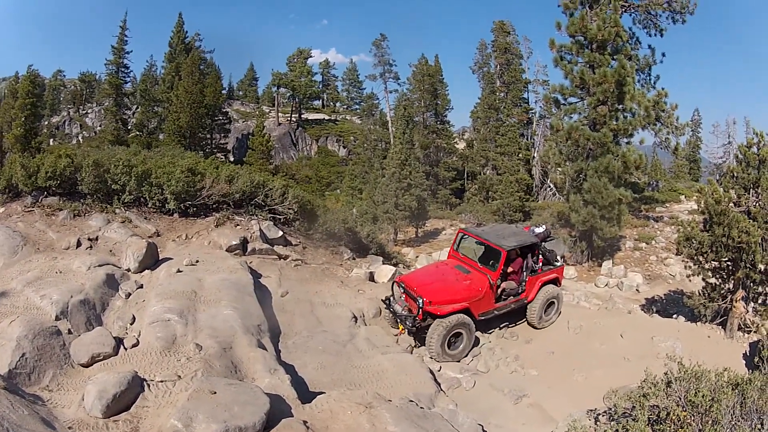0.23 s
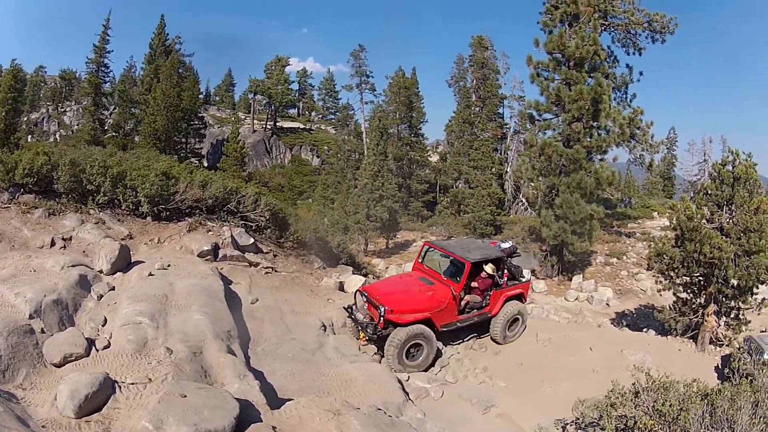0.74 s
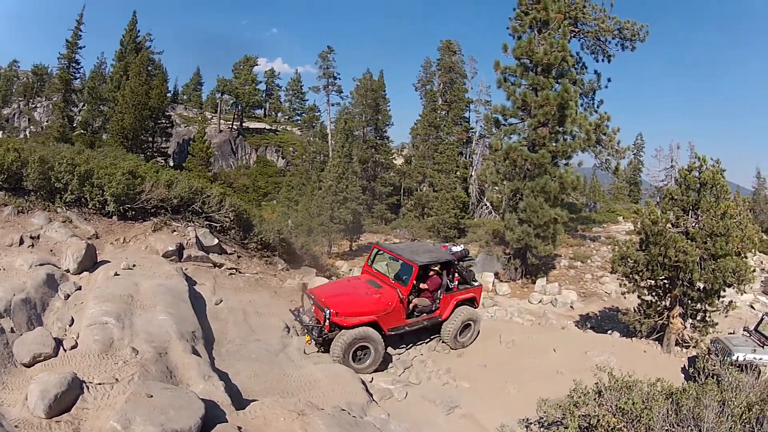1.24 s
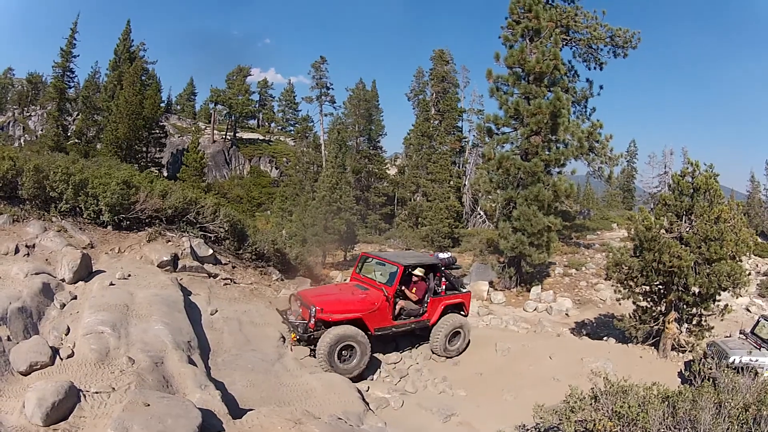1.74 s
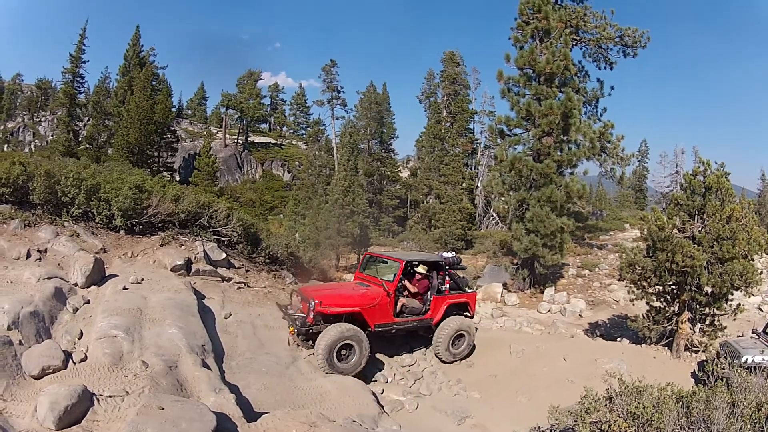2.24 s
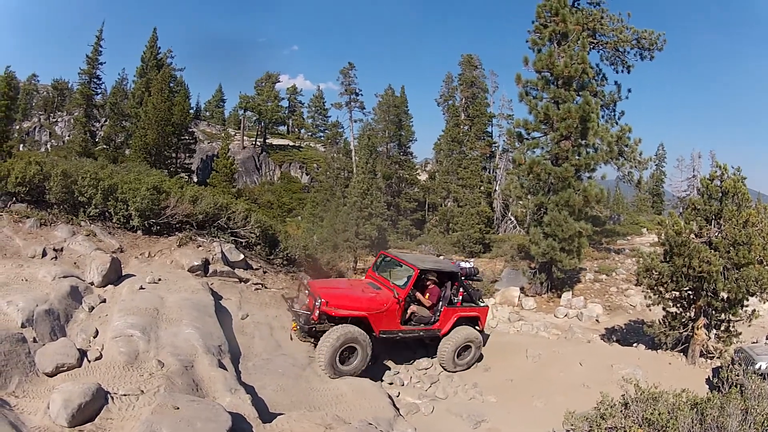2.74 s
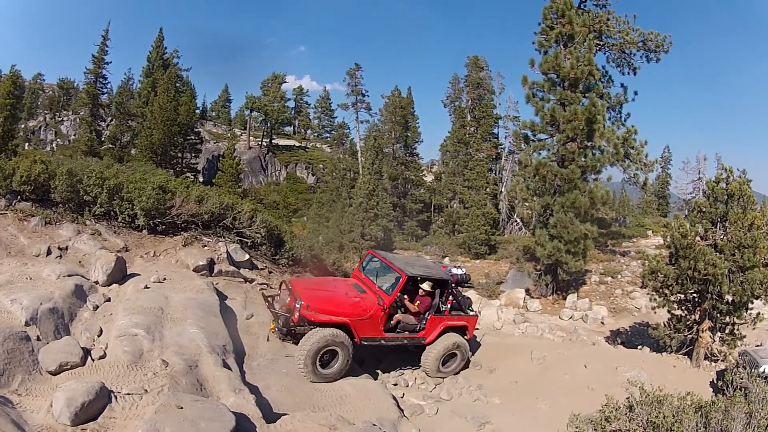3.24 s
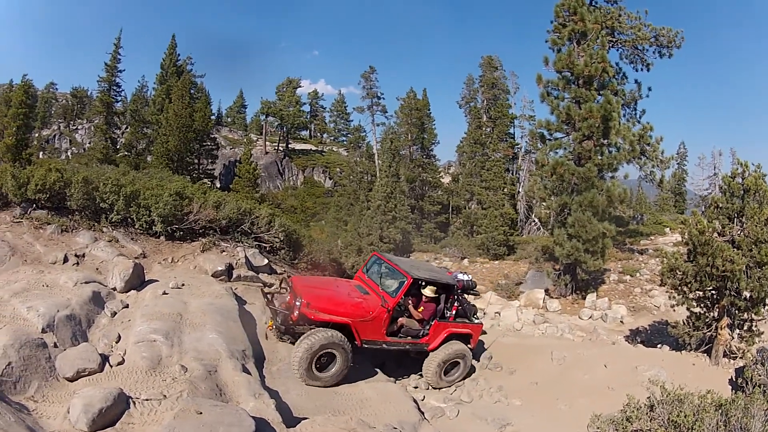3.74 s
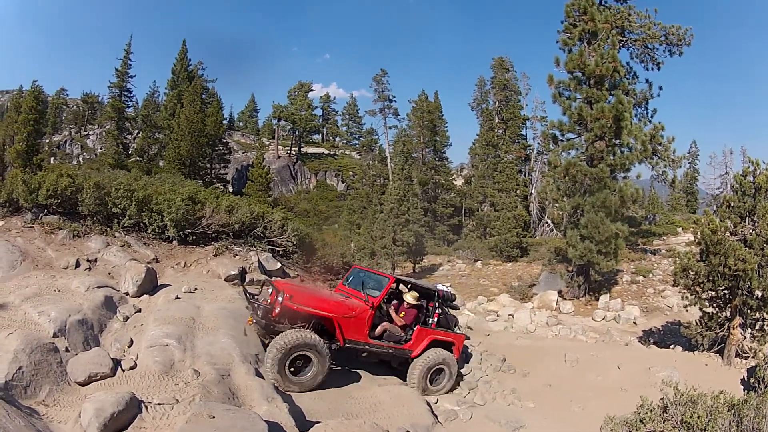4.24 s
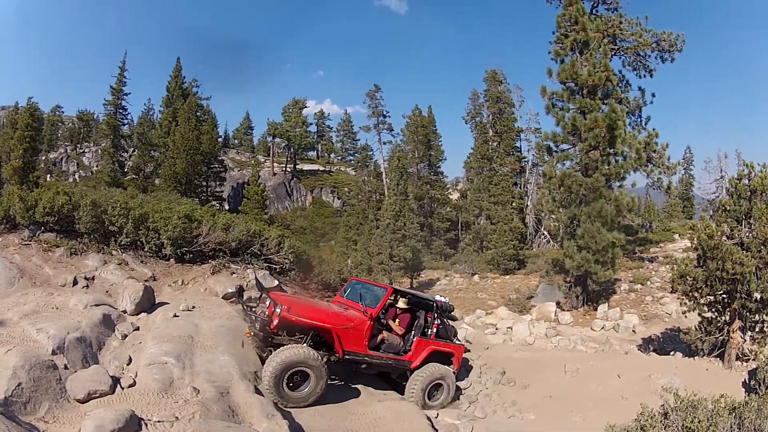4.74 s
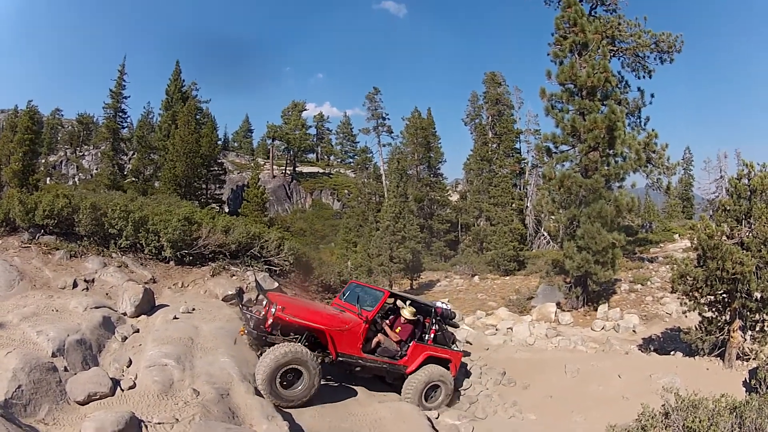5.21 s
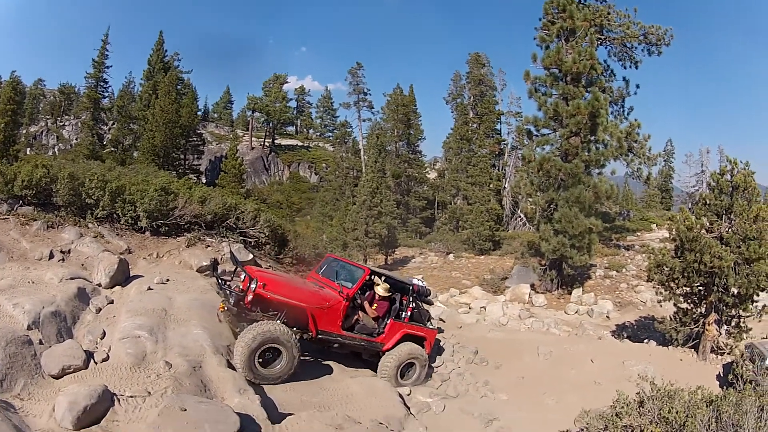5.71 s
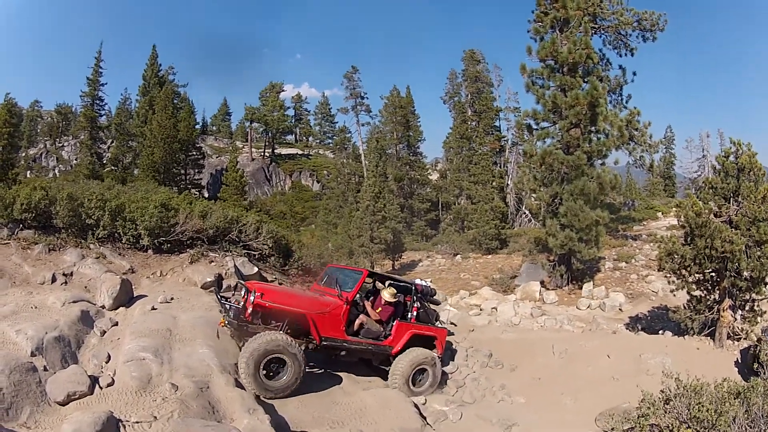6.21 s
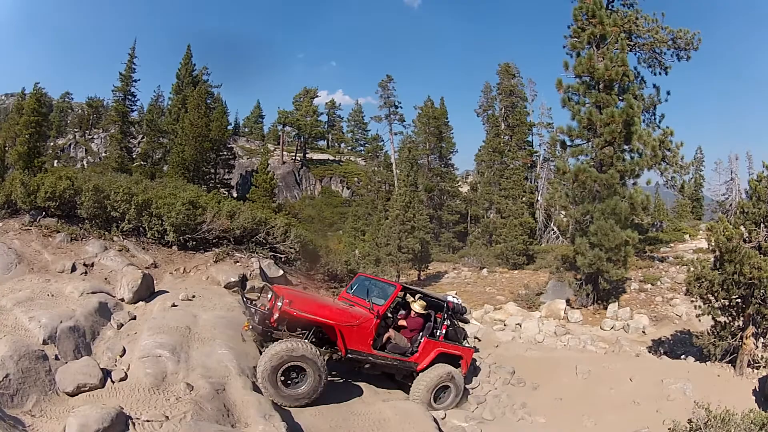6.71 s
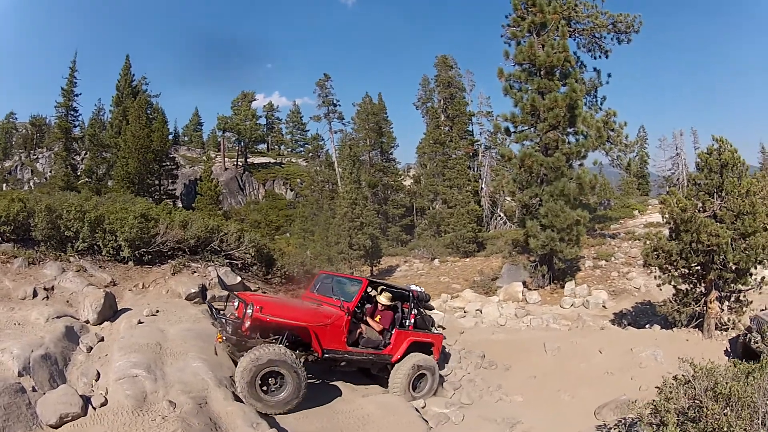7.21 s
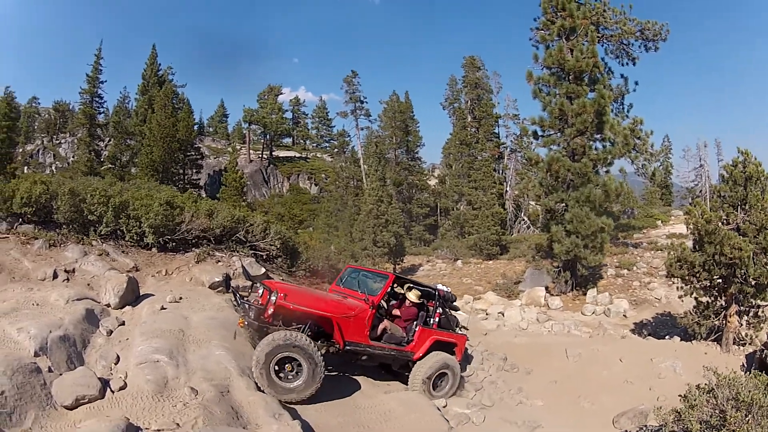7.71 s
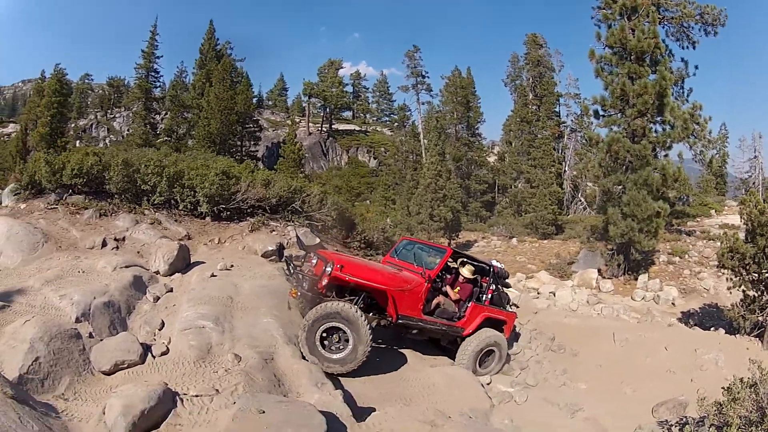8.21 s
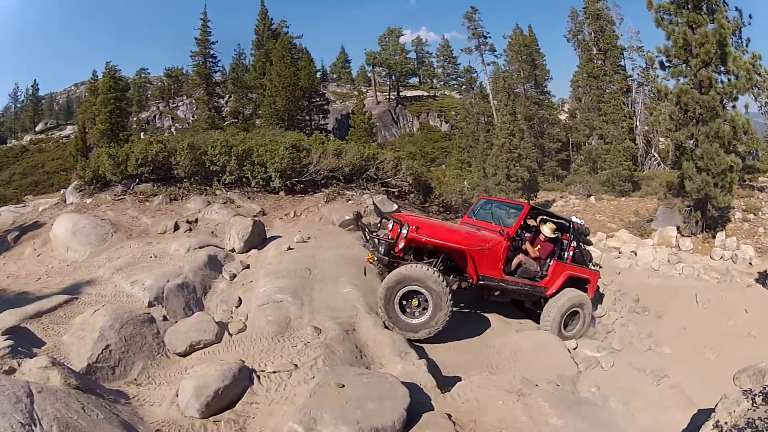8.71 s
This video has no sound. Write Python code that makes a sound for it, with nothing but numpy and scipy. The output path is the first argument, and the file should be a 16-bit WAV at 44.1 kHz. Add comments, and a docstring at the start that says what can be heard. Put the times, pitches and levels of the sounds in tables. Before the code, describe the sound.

Outdoors in open forest, an off-road car some way off crawls up rock, its uneven low exhaust throb rising and falling with the throttle. Tyres give brief gritty scrapes and rubbery groans, then a low judder. A light breeze runs beneath. Small taps touch the camera now and then, and near the end a hand shifts its grip with rubs, thumps and loud knocks.

```python
"""On a rock slab in a forest, some way off, an eight-cylinder off-road car crawls upward, its exhaust throbbing.
The exhaust is a train of unequal pulses ringing in a pipe; noise bands give its gas and the whirring engine bay.
Tyres scrape, groan and judder by friction on gritty stone and springs squeak; filtered noise is a light wind.
A hand taps the camera now and then, ringing the modes of its case, and near the end shifts its grip
with rubs and hard knocks."""
import sys
import numpy as np
from scipy import signal
from scipy.fft import rfft, irfft
from scipy.io import wavfile
from scipy.ndimage import uniform_filter1d

SR = 44100
rng = np.random.default_rng(int(sys.argv[2]) if len(sys.argv) > 2 else 0)


def wav_out(sig):
    """Save sig, one row per channel (or a flat mono array), as 16-bit PCM at SR to the path in sys.argv[1]."""
    wavfile.write(sys.argv[1], SR, np.round(np.clip(np.atleast_2d(sig).T, -1, 1) * 32767).astype(np.int16))


N = 394681
TIME = np.arange(N) / SR  # seconds

# Crank speed. Each row: time in seconds, speed in revolutions per minute.
CRANK_SPEED = [(0.0, 791), (0.43, 853), (1.19, 1078), (1.53, 1085), (1.9, 1314), (2.28, 1123), (3.61, 1144),
               (4.1, 1423), (4.46, 1751), (4.63, 1687), (4.94, 1789), (5.24, 1136), (5.45, 998),
               (5.62, 1110), (6.05, 1275), (6.6, 1330), (7.12, 1088), (7.41, 1416), (8.03, 1575),
               (8.69, 1540), (8.95, 1592)]
# Cylinders in firing order. Each row: relative pulse strength, travel time through the manifold in ms.
CYLINDERS = [(0.83, 4.52), (1.09, 6.41), (0.3, 5.14), (1.03, 4.38), (0.91, 0.0), (0.57, 4.41), (1.48, 5.12),
             (0.79, 0.02)]
CRANK_START = .095  # fraction of the two-turn cycle already passed at the start


def firings():
    """Four-stroke cycle: each cylinder fires once in two crank turns, less evenly at low speed."""
    rpm = follow(CRANK_SPEED)
    count = len(CYLINDERS)
    cycles = np.cumsum(rpm / (2 * 60)) / SR + CRANK_START
    fired = np.floor(count * cycles).astype(int)
    at = np.flatnonzero(np.diff(fired)) + 1
    strength, travel_ms = np.transpose(CYLINDERS)[:, fired[at] % count]
    spread = .04 + .08 * (rpm.min() / rpm[at]) ** 2
    arrival = at + np.round(travel_ms * SR / 1000).astype(int)
    pulses = np.zeros(N)
    pulses[np.minimum(arrival, N - 1)] = strength * (1 + spread * rng.standard_normal(len(at)))
    return pulses


# Load on the engine. Each row: time in seconds, effort in dB, of which each engine sound takes a share.
EFFORT = [(0, -0.5), (.45, -8.5), (1.0, 1.5), (1.35, -4), (1.85, 0), (2.35, -6), (2.95, -4.5), (3.36, -11),
          (3.95, -0.5), (4.6, 3), (5.35, -2), (6.4, 2), (6.95, -4.5), (7.5, 1.5), (7.9, -3)]
CRUISE_RPM = 1200


def loudness(law):
    """Source-strength law: the gain grows with speed, nearness and effort."""
    db, doubling_db, nearing_db_per_s, share = law
    speed_db = doubling_db * np.log2(follow(CRANK_SPEED) / CRUISE_RPM)
    return amp(db + speed_db + nearing_db_per_s * TIME + share * follow(EFFORT))


# Resonance of exhaust pipe and silencer. Each row: frequency in Hz before the heat shift, relative gain in dB.
PIPE = [(20, -42), (55, -23), (80, -22), (110, -22), (125, -27), (140, -12), (155, -7), (170, -1), (185, 3),
        (200, -10.5), (215, -25), (240, -35), (380, -32), (480, -42), (1500, -65)]
# Exhaust loudness: level in dB at cruising speed and time zero, dB per doubling of speed,
# dB per second as the car nears and turns side-on, share of the effort.
DRONE_LAW = (-51, 15.5, 1.1539, 1.08)
# Pitch rise of the hotter pipe, as fractions; at cruising speed the listed pitch holds at WARM_AT_S seconds.
HEAT_PER_DOUBLING, HEAT_PER_S, WARM_AT_S = .117, .009, 6
THROB = 0.19  # exponent on short-term power: the boom grows more than in proportion


def exhaust(pulses):
    """Pipe resonance: pulses ring at a pitch that rises with heat; unequal cylinders throb once a cycle."""
    speed_heat = HEAT_PER_DOUBLING * np.log2(follow(CRANK_SPEED) / CRUISE_RPM)
    pitch = 1 + speed_heat + HEAT_PER_S * (TIME - WARM_AT_S)
    # filter on a warped clock, then return to real time, so that the resonances move
    clock = np.cumsum(pitch)
    ticks = np.arange(clock[-1])
    ringing = colour(np.interp(ticks, clock, pulses), PIPE)
    note = np.interp(clock, ticks, ringing)
    note = note * smooth(note ** 2, size=450) ** THROB
    levelled = note / np.sqrt(smooth(note ** 2, size=7000))
    return loudness(DRONE_LAW) * levelled


def puff_strength(pulses):
    """Exponential decay: each firing lets out a puff fading over 9 ms, the strong cylinders most."""
    return unit(signal.lfilter([1], [1, -np.exp(-1 / (.009 * SR))], pulses ** 2))


# Colour of the escaping gas. Each row: frequency in Hz, relative density in dB per Hz.
GAS = [(150, -32), (260, 2), (365, -1), (454, -3), (722, -16), (808, -6), (977, -15.5), (1290, -26),
       (1400, -12.5), (1820, -35), (3080, -120)]
# Gas loudness: level in dB at cruising speed and time zero, dB per doubling of speed,
# dB per second of nearing, share of the effort.
GAS_LAW = (-69, 9.5, 1.303, 0.32)


def gas_rush(puffs, steady=1.0, flutter_db=1.5):
    """Turbulent jet noise: a steady stream plus the puffs, fluttering at random."""
    flow = rng.standard_normal(N) * (steady + puffs)
    gas = colour(flow * amp(flutter_db * wander(11.3)), GAS)
    return loudness(GAS_LAW) * unit(gas)


# Colour of the engine bay. Each row: frequency in Hz, relative density in dB per Hz.
BAY = [(900, -21), (1300, -23.5), (1640, -13), (1900, -14.5), (2100, -2), (2330, -13), (2500, -9.5),
       (2800, -15.5), (3240, -18), (3800, -20.5), (4700, -27), (5800, -20.5)]
# Bay loudness: level in dB at cruising speed and time zero, dB per doubling of speed,
# dB per second of nearing, share of the effort.
BAY_LAW = (-59, 6.5, 0.6252, 0.18)


def engine_bay(puffs, steady=5, drift_db=1.3):
    """Forced panel vibration: steady whirr plus a shake at each firing, ringing near 2 kHz."""
    bay = colour(rng.standard_normal(N) * (steady + puffs), BAY)
    bay = ground_echo(bay) * amp(drift_db * wander(2.1))
    return loudness(BAY_LAW) * unit(bay)


def ground_echo(x):
    """Comb filtering: the rock returns the sound after a delay that drifts as the car rocks."""
    delay_s = .0024 + .00012 * wander(1)
    return x + .35 * np.interp(TIME - delay_s, TIME, x)


# Tyres scraping on rock. Each row: start in seconds, length in seconds, level in dB.
SCRAPES = [(2.28, 0.44, -58.5), (4.357, 0.074, -44), (4.825, 0.065, -47.5), (4.87, 0.28, -50),
           (5.423, 0.032, -47.5), (5.9, 0.063, -51), (7.308, .04, -42), (7.364, 0.046, -52)]
# Colour of gritty stone. Each row: frequency in Hz, relative density in dB per Hz.
GRIT = [(300, -16), (800, -5), (1200, -17.5), (2100, 3.5), (3200, -7.5), (4500, -12.5), (5800, -12.5)]


def tyres():
    """Sliding friction: tyres scrape over gritty stone."""
    return friction(SCRAPES, GRIT, grain_db=2.5, rise=.07)


def friction(strokes, spectrum, grain_db, rise):
    """Random micro-slips: each stroke is a run of uneven slips that swells quickly and fades."""
    force = np.zeros(N)
    for s, length, db in strokes:
        force += amp(db) * np.interp((TIME - s) / length, [0, rise, .55, 1], [0, 1, .8, 0])
    slips = unit(rng.standard_normal(N) * amp(grain_db * wander(180)))
    return colour(slips * force, spectrum) / np.std(colour(slips, spectrum))


# The tread judders once the front tyres bite into the slab.
JUDDER_FROM_S, JUDDER_PER_S, JUDDER_LENGTH_S = 7.65, 12, 0.049
JUDDER_HZ, JUDDER_SPREAD = 341.7, 0.13  # middle pitch, and its largest deviation as a fraction
JUDDER_DB = -45.5  # each grunt is scaled by a random 0.5 to 1.5


def judder():
    """Stick-slip release: tread blocks let go of the rock in turn, each with a short low grunt."""
    out = np.zeros(N)
    t = np.arange(0, JUDDER_LENGTH_S, 1 / SR)
    swell = np.sin(np.pi * t / JUDDER_LENGTH_S) ** 2
    for k, (late, pitch, strength) in enumerate(rng.random(size=(40, 3))):
        hz = JUDDER_HZ * (1 + JUDDER_SPREAD * (2 * pitch - 1))
        grunt = swell * np.sin(2 * np.pi * hz * t)
        add(out, JUDDER_FROM_S + (k + late) / JUDDER_PER_S, amp(JUDDER_DB) * (.5 + strength) * grunt)
    return out


# Rubber groaning on stone and springs squeaking. Each row: start in seconds, length in seconds,
# middle pitch in Hz, peak level in dB before the roughness.
SQUEAKS = [(0.512, 0.027, 5600, -62), (2.235, 0.28, 577, -65), (4.352, 0.051, 785, -50.5),
           (5.013, 0.072, 604, -53), (5.016, 0.052, 4330, -63), (5.363, 0.095, 497, -58.5),
           (5.843, 0.078, 677, -54), (6.523, 0.043, 5270, -50), (6.616, 0.053, 330, -51),
           (7.11, .04, 372, -55)]


def squeaks(waver_hz=35, rough_db=4.5):
    """Stick-slip oscillation: rubber and springs sound short tones of unsteady pitch and level."""
    out = np.zeros(N)
    drift_hz = waver_hz * wander(144)
    for s, length, hz, db in SQUEAKS:
        swell = np.sin(np.pi * np.clip((TIME - s) / length, 0, 1))
        out += amp(db) * swell * np.sin(2 * np.pi * np.cumsum(hz + drift_hz) / SR)
    return out * amp(rough_db * wander(44))


# Modes of the camera case. Each row: frequency in Hz, relative level in dB, 60 dB decay time in seconds.
CASE_MODES = [(117.3, -2, 0.088), (224.4, -3, 0.067), (366, -6.5, 0.062), (648, -6, 0.03), (854, -6, 0.028),
              (1120, 4, 0.0023), (1460, -4.5, 0.0081), (1816, -7, 0.018), (2167, -8, 0.021),
              (3530, -1, 0.0025)]
# Knocks on the camera. Each row: start in seconds, strength in dB, contact time in ms,
# extra gain of the modes below 500 Hz in dB.
KNOCKS = [(2.604, -31.5, 1.06, -10), (3.041, -35, 0.92, -6), (4.248, -29, 1.2, -12),
          (4.639, -31.5, 1.4, -15), (6.246, -32, 0.65, -10), (8.202, -27, 0.24, -24),
          (8.297, -33, 1.7, -12), (8.32, -19.5, 0.5, -0.5), (8.356, -9.5, 0.41, -5), (8.368, -18, 0.46, -6),
          (8.376, -11.5, 0.27, -7.5), (8.395, -4, 0.353, -6), (8.487, -27, 0.42, -4)]


def knocks():
    """Modal excitation: a knock rings the camera case, more brightly for a shorter contact."""
    out = np.zeros(N)
    t = np.arange(SR // 5) / SR
    hz, mode_db, t60 = np.transpose(CASE_MODES)[:, :, None]
    decay = np.exp(-np.log(1000) * t / t60)
    rings = amp(mode_db) * decay * np.sin(2 * np.pi * hz * t)
    rings[1::2] *= -1  # neighbouring modes push the microphone opposite ways
    low = hz < 500
    for s, db, contact_ms, thud_db in KNOCKS:
        force = np.sin(np.pi * np.minimum(1000 * t[:200] / contact_ms, 1)) ** 2
        ringing = (amp(db + thud_db * low) * rings).sum(0)
        add(out, s, -np.convolve(ringing, force / force.sum()))
    return out


# The case flexing under the hand. Each row: centre time in seconds, frequency in Hz, peak level in dB.
PUSHES = [(8.109, 45.2, -22.5), (8.278, 49.6, -16.5), (8.319, 62.7, -28), (8.384, 100.3, -10)]


def pushes(width_cycles=0.48):
    """Quasi-static flexing: a slow push gives a dull thump, a cosine under a Gaussian swell."""
    out = np.zeros(N)
    for s, push_hz, db in PUSHES:
        cycles = (TIME - s) * push_hz
        swell = np.exp(-np.minimum((cycles / width_cycles) ** 2 / 2, 20))
        out -= amp(db) * swell * np.cos(2 * np.pi * cycles)
    return out


# Fingers rubbing on the camera. Each row: start in seconds, length in seconds, hiss of the skin in dB,
# hollow answer of the case in dB.
RUBS = [(8.072, 0.23, -34.5, -53.5), (8.19, 0.15, -69, -63), (8.258, 0.14, -36.5, -38),
        (8.364, 0.059, -37.5, -37), (8.493, 0.14, -43.5, -44.5), (8.628, 0.35, -50, -49.5)]
# Colour of the skin. Each row: frequency in Hz, relative density in dB per Hz.
SKIN = [(100, 11), (400, -10.5), (750, -5), (1200, -6), (2000, 1.5), (2900, -8), (3500, -1.5),
        (4300, -19.5), (5800, -19)]
# Colour of the hollow case. Each row: frequency in Hz, relative density in dB per Hz.
HOLLOW = [(200, -26), (330, 0.5), (520, -17), (650, -0.5), (780, -0.5), (900, -3), (1200, -20.5),
          (3000, -43)]


def fingers():
    """Friction-driven resonance: skin slips over the camera and stirs its hollow case."""
    skin_strokes = [(s, length, skin_db) for s, length, skin_db, _ in RUBS]
    case_strokes = [(s, length, case_db) for s, length, _, case_db in RUBS]
    skin = friction(skin_strokes, SKIN, grain_db=2.5, rise=.12)
    case = friction(case_strokes, HOLLOW, grain_db=3, rise=.12)
    return skin + case


# Colour of the low breeze. Each row: frequency in Hz, relative density in dB per Hz.
WIND = [(12, -49), (20, -23.5), (48, 4.5), (97, -2.5), (244, -8.5), (429, -20), (492, -16.5), (730, -25),
        (1200, -24.5), (1560, -50), (2640, -120)]
# The breeze freshens. Each row: time in seconds, change of level in dB.
BREEZE = [(0, -1.5), (2.8, -1), (4.7, -4), (5.6, 1.5), (7.3, 2.5), (8.95, 7.5)]
# Breeze in the pines. Each row: frequency in Hz, relative density in dB per Hz.
NEEDLES = [(500, -3.5), (1300, 2.5), (3000, -0.5), (4500, -1), (5800, -11)]
# Far rustle of the forest. Each row: frequency in Hz, relative density in dB per Hz.
FOREST = [(60, -17.5), (130, 3), (250, 0.5), (400, -7.5), (650, -13.5), (800, -9), (1200, -27), (2500, -45)]


def wind(wind_db=-55, gust_db=2, needles_db=-69, forest_db=-66):
    """Turbulence noise: a low, lumpy breeze over a faint steady hiss and rustle in the trees."""
    rumble = unit(noise(WIND) * amp(gust_db * wander(3.6)))
    breeze = amp(wind_db + follow(BREEZE)) * rumble
    return breeze + amp(needles_db) * noise(NEEDLES) + amp(forest_db) * noise(FOREST)


def amp(db):
    """Logarithmic level: decibels to gain."""
    return 10 ** (np.asarray(db) / 20)


def unit(x):
    """Effective value: scales to an rms of 1."""
    return x / np.sqrt(np.mean(x ** 2) + 1e-20)


def follow(rows):
    """Linear interpolation: a time curve at every sample."""
    return np.interp(TIME, *np.transpose(rows))


def add(mix, s, sound):
    """Superposition: mixes a sound in at a time in seconds."""
    part = mix[max(round(s * SR), 0):][:len(sound)]
    part += sound[:len(part)]


def colour(x, spectrum, size=16384):
    """Minimum-phase filtering: a causal filter whose spectral peaks ring after each pulse."""
    hz, db = np.transpose(spectrum)
    bins_hz = abs(np.fft.fftfreq(size, 1 / SR))
    log_gain = np.interp(np.log(bins_hz + 1), np.log(hz + 1), db) * np.log(10) / 20
    # the Hilbert transform of the log gain gives the phase
    response = np.fft.ifft(np.exp(np.conj(signal.hilbert(log_gain)))).real
    return signal.oaconvolve(x, response[:size // 2])[:len(x)]


def noise(spectrum):
    """Spectral shaping: coloured noise of rms 1, with the filter's first second dropped."""
    return unit(colour(rng.standard_normal(N + SR), spectrum)[SR:])


def wander(rate):
    """Low-passed noise: slow chance of rms 1, changing about rate times a second."""
    hz = np.fft.rfftfreq(N, 1 / SR)
    return unit(irfft(rfft(rng.standard_normal(N)) / (1 + (hz / rate) ** 4), N))


def smooth(power, size):
    """Short-term averaging: the running mean of a power, taken twice."""
    return abs(uniform_filter1d(uniform_filter1d(power, size), size)) + 1e-15


def scene():
    """Superposition of the car, the hand on the camera and the breeze."""
    pulses = firings()
    puffs = puff_strength(pulses)
    engine = exhaust(pulses) + gas_rush(puffs) + engine_bay(puffs)
    contact = tyres() + judder() + squeaks()
    hand = knocks() + pushes() + fingers()
    return (engine + contact + hand + wind())[None]


def record(dry, top_hz=15400):
    """Sample-and-hold imaging: holding 12 kHz samples mirrors the sound into the treble, up to a band limit."""
    coarse = signal.resample_poly(dry, 40, 147, axis=1, window=("kaiser", 6))
    coarse = signal.oaconvolve(coarse, signal.firwin(41, 5700, fs=12000)[None], "same")
    held = np.repeat(coarse, 4, axis=1)  # now at 48 kHz
    held = signal.resample_poly(held, 147, 160, axis=1)[:, :N]
    band_limit = signal.firwin(301, top_hz, window=("kaiser", 9), fs=SR)
    return signal.oaconvolve(held, band_limit[None], "same")


dry = scene()
out = record(dry)
wav_out(out)
```